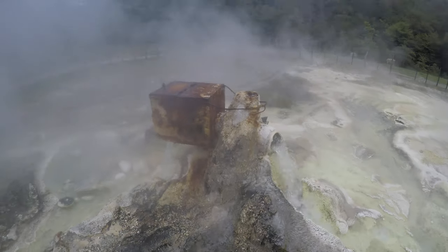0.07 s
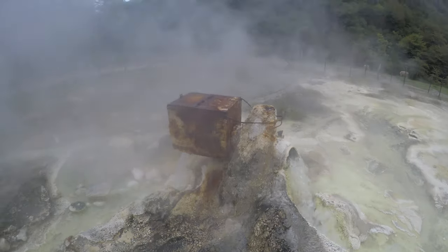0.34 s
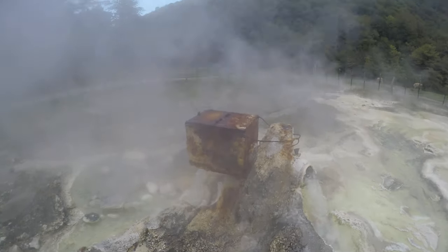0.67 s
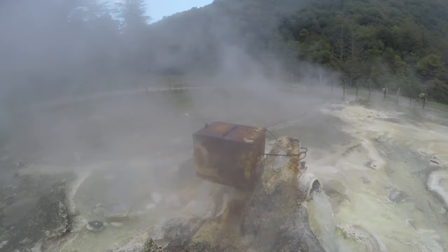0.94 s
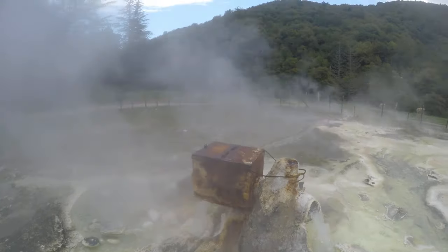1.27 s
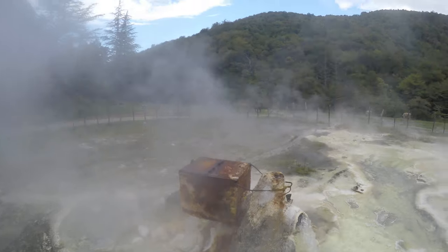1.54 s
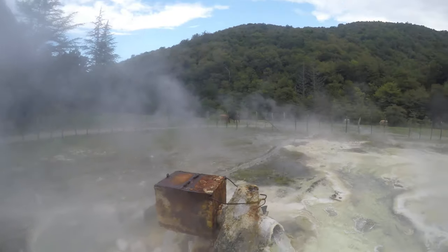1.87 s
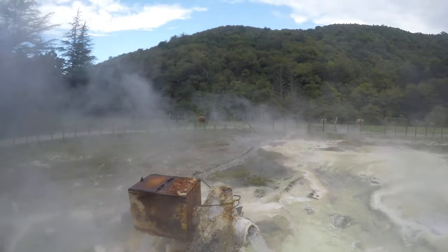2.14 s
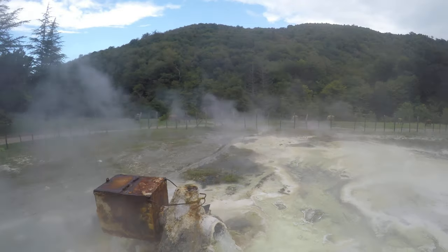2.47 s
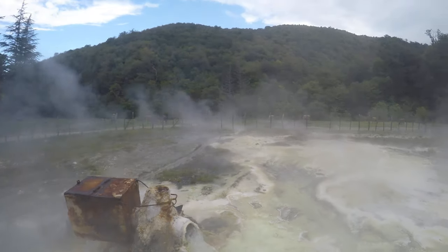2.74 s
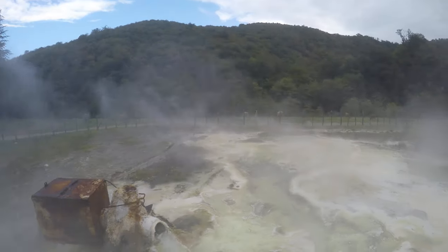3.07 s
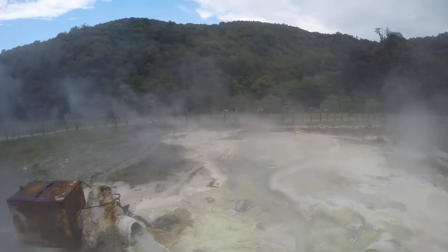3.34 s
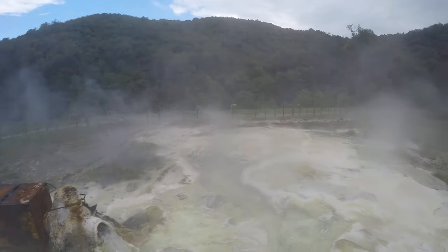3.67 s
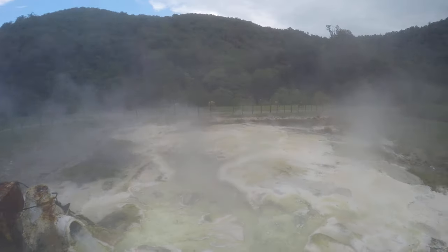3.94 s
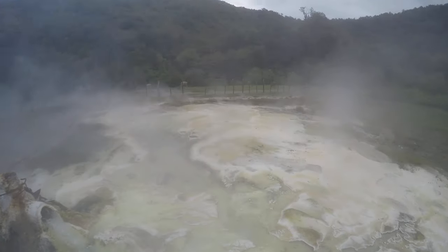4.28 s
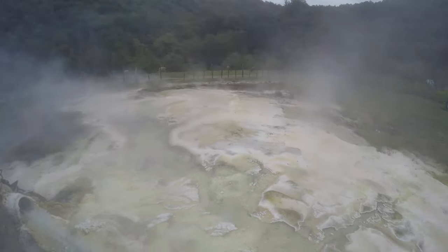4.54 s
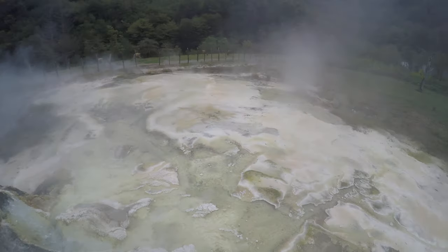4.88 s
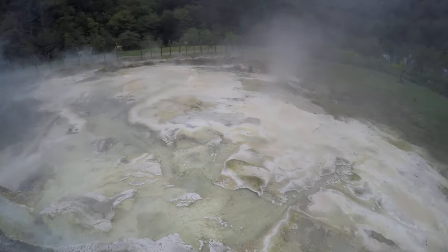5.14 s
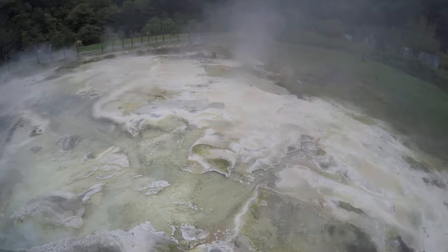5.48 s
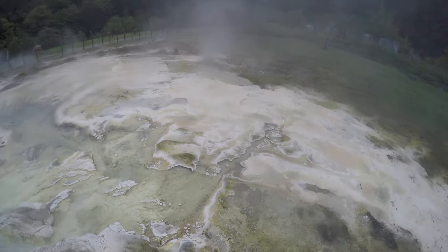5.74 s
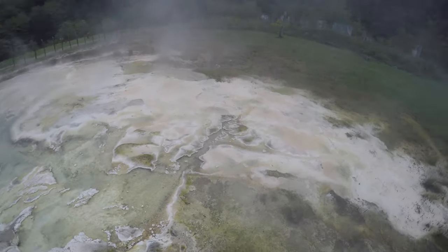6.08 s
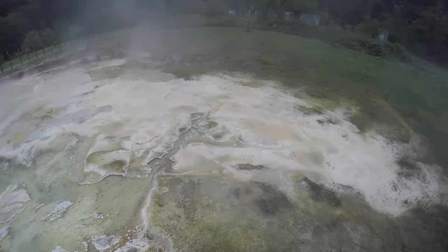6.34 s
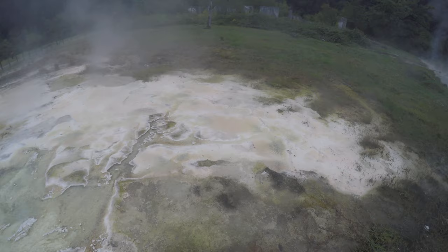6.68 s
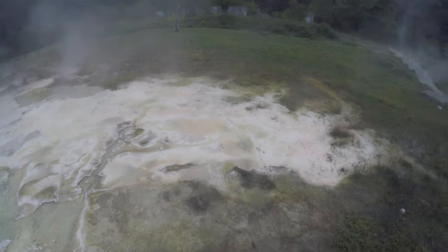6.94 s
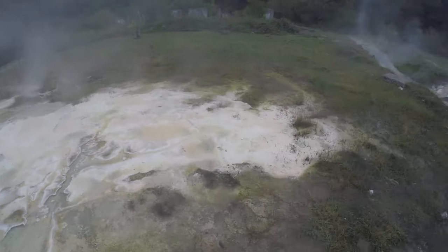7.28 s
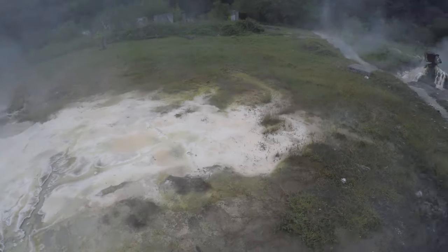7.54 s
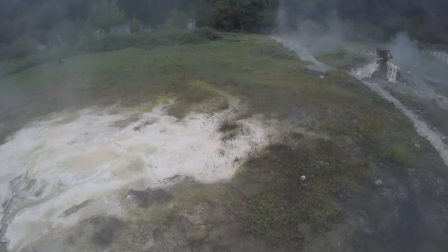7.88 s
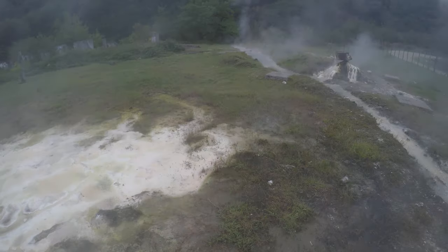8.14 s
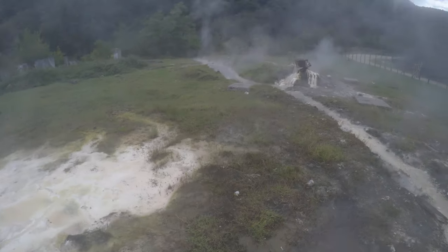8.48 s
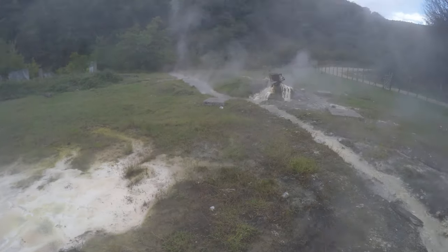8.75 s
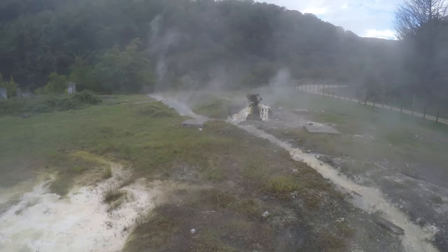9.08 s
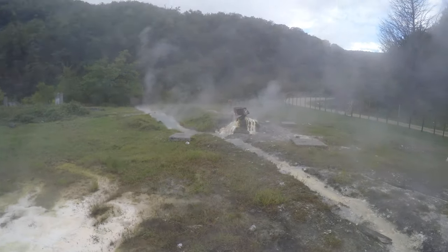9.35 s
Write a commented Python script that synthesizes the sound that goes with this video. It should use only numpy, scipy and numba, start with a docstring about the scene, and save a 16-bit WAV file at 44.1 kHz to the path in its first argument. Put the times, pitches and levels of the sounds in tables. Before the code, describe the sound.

Hot water gushes and splatters steadily from an outdoor pipe with a steamy hiss, scattered plinks and a few faint handling bumps.

```python
"""Hot water gushes from a pipe onto a mineral crust: dense drop impacts, tiny bubbles and steam hiss.
From the start heavy slugs slap down, close drops plink and fingers bump the grip of a hand-held camera.
The camera turns steadily away, and near reflections shift the colour of the splatter.
After five seconds the gush begins to fade into the camera's shadow; one loud plink follows at 6.6 s.
A light breeze on the microphone and a faint electronic whine lie underneath to the end."""
import sys
import numpy as np
from scipy import signal
from scipy.fft import rfft, irfft
from scipy.io import wavfile
from scipy.ndimage import uniform_filter1d
from numba import njit

SR = 44100
rng = np.random.default_rng(int(sys.argv[2]) if len(sys.argv) > 2 else 0)


def unload_audio(sound):
    """Save the sound as a 16-bit wav file, at the path given as the first command line argument."""
    columns = np.transpose(np.atleast_2d(sound))
    # keep every value between -1 and 1, then stretch to whole-number steps
    steps = np.round(np.clip(columns, -1, 1) * 32767)
    wavfile.write(sys.argv[1], SR, steps.astype(np.int16))


N = 414981
TIME = np.arange(N) / SR

# Level ride of the gush. Each row: time in seconds, level in dB before the turn fades and colours it.
GUSH_RIDE = [(0.0, -46.5), (0.2, -44.8), (1.0, -46), (1.3, -46.5), (2.4, -46), (4.4, -46), (5.05, -46),
             (5.45, -46.5), (6.1, -45.5), (9.4, -45.5)]
def gush(sputter_db, flutter_db, churn_db, fizz_db, gurgle_db, steam_db, away_db):
    """The jet breaks into clumps: impacts and fizz surge, the pool gurgles, steam hisses evenly."""
    clumps = walk(28)
    # the flow is steady, so every clump is followed by a thinner stretch
    clumps = clumps - uniform_filter1d(clumps, size=SR // 6)
    surge = undb(sputter_db * clumps + flutter_db * walk(85))
    fizz = bubbles(count=26000, lo_hz=2200, hi_hz=14550, cycles=27.0, spread_db=2.5)
    spray = unit(surge * (impacts(per_s=16000, spread_db=1.4) + undb(fizz_db) * fizz))
    pool = bubbles(count=6000, lo_hz=501.0, hi_hz=2210, cycles=17.4, spread_db=2.5)
    gurgle = pool * undb(gurgle_db + churn_db * walk(13))
    # turned away, more of what arrives is a diffuse wash
    steam = undb(steam_db + away_db * shade(TIME)) * rng.standard_normal(N)
    return unit(spray + gurgle + steam) * undb(curve(GUSH_RIDE, TIME) - edge_fade_db(TIME))


def impacts(per_s, spread_db):
    """Drops strike the crust as sharp clicks, many small and a few large."""
    hits = rng.random(N) < per_s / SR
    clicks = hits * rng.standard_normal(N)
    accent_db = spread_db * np.minimum(rng.exponential(size=N), 2 * np.e)
    return unit(clicks * undb(accent_db))


def bubbles(count, lo_hz, hi_hz, cycles, spread_db):
    """A cloud of short-lived bubbles, each ringing at the pitch of its size."""
    when, pitch, life, chance = rng.random((count, 4)).T
    starts = (when * N).astype(np.int64)
    hz = lo_hz * (hi_hz / lo_hz) ** pitch
    accent_db = spread_db * np.minimum(-np.log(1 - chance), 2 * np.e)
    # small bubbles ring briefly, so equal energy per Hz takes a higher peak
    peaks = hz * undb(accent_db)
    return unit(bubble_rings(starts, hz, cycles * (.5 + life), peaks, rise=0.26))


@njit
def bubble_rings(starts, hz, cycles, peaks, rise):
    """Each bubble is a damped sine that bends up in pitch as it fades."""
    out = np.zeros(N)
    for k in range(len(starts)):
        length, phase = int(cycles[k] * SR / hz[k]), 0.
        for i in range(min(length, N - starts[k])):
            phase += 2 * np.pi * hz[k] * (1 + rise * i / length) / SR
            out[starts[k] + i] += peaks[k] * np.exp(-6 * i / length) * np.sin(phase)
    return out


# The heaviest slugs of water. Each row: start in seconds, peak in dB before colouring.
SLAP_CUES = [(0.012, -31.5), (0.152, -30), (0.448, -35.5), (0.475, -36), (0.783, -38), (1.2983, -31),
             (1.387, -37), (1.4, -32.5), (2.3415, -37), (2.545, -32), (3.008, -29), (3.3965, -33.5),
             (4.209, -36), (4.329, -34), (4.426, -34), (5.229, -33.5), (5.653, -31.5), (6.312, -33),
             (6.976, -34)]
def slaps(attack_s, decay_s, pocket_hz, pocket_db):
    """Each slug lands as a short shower of impacts that rings the air pocket under it."""
    out, t = np.zeros(N), TIME[:SR // 8]
    envelope = (1 - np.exp(-t / attack_s)) * np.exp(-t / decay_s)
    for start, db in SLAP_CUES:
        shower = rng.standard_normal(len(t))
        pocket = unit(band(shower, pocket_hz / 1.83, pocket_hz * 1.52))
        slap = envelope * (shower + undb(pocket_db) * pocket)
        add(out, start, undb(db) * slap / np.abs(slap).max())
    return out


# Tone of the splatter from the front. Each row: frequency in Hz, relative level in dB.
SPLATTER_EQ = [(200, -14), (410, -13.5), (750, -7.5), (1310, -6.5), (2130, -4), (3090, -6), (4220, -6.0),
               (5280, -7.0), (6810, -14.5), (8050, -15.5), (10000, -23), (12000, -26.5), (15000, -26.5)]
# The camera body's shadow at full depth. Each row: frequency in Hz, relative gain in dB.
SHADOW_EQ = [(300, -1.0), (1800, -4), (4000, -8), (4360, -14), (5650, -12.5), (8440, -10), (10000, -6.5),
             (15000, -6.5)]
# Peaks and hollows of the microphone port. Each row: centre in Hz, width in Hz, relative gain in dB.
PORT_EQ = [(1260, 220, 1.0), (1590, 180, -2.0), (1830, 180, 1.0), (2930, 270, 5.0), (3280, 390, 5.0),
           (3730, 160, -3.5), (3960, 200, -0.5), (4250, 230, -2.5), (7400, 1000, 0.5), (13460, 980, 2.5)]
# Near reflections that add or cancel as the camera turns. Each row: centre in Hz, width in Hz,
# relative gain in dB, strongest heading in degrees, width of the heading range in degrees.
REFLECTION_EQ = [ (680, 285, -5.5, 133, 65), (890, 280, -6, 168, 40), (983, 183, -3.5, 45, 85),
                 (1800, 256, 5.5, 118, 100), (1950, 430, -3.5, 32, 22), (2288, 280, 8, 3.7, 75),
                 (2474, 275, -8, 52, 78), (3053, 380, -10.5, 151, 70), (4870, 810, -8.5, 137, 56),
                 (5450, 850, 4, 116, 42), (6140, 510, -5, 56, 91), (6380, 260, -8.5, 110, 59),
                 (7500, 1200, 3, 128, 40), (8560, 1400, 7.5, 35, 36), (8870, 1400, -6, 117, 124),
                 (10850, 610, -6.5, 82, 71), (11800, 900, 4, 5, 45)]
def colour(water):
    """Crust, shadow, port and reflections shape the water: a moving EQ held at constant power."""
    hz, times, frames = signal.stft(water, SR, nperseg=1024)
    hz = hz[:, None]
    db = spectrum_db(SPLATTER_EQ, hz) + spectrum_db(SHADOW_EQ, hz) * shade(times)
    for centre, width, peak_db in PORT_EQ:
        db += peak_db * bell(hz, centre, width)
    for centre, width, peak_db, best_deg, range_deg in REFLECTION_EQ:
        db += peak_db * bell(hz, centre, width) * bell(heading(times), best_deg, range_deg)
    gain = undb(db)
    gain /= np.sqrt(np.mean(gain ** 2, axis=0))
    return signal.istft(frames * gain, SR)[1][:N]


# The slow turn away from the pipe. Each row: time in seconds, heading in degrees.
TURN = [(0, -10), (1.5, 18), (4.0, 57), (6.0, 105.5), (8.3, 165), (9.4, 176)]
def heading(times):
    """Degrees between the camera's axis and the outlet."""
    return curve(TURN, times)


def edge_fade_db(times, edge_deg=87.5, db_per_deg=0.1126):
    """Past the edge of the camera body the gush fades with every further degree."""
    return db_per_deg * np.maximum(heading(times) - edge_deg, 0)


def shade(times, half_deg=126, soft_deg=19):
    """Depth of the camera's shadow: near 0 facing the outlet, near 1 turned away."""
    return .5 + .5 * np.tanh((heading(times) - half_deg) / (2 * soft_deg))


# Close drops that trap a bubble. Each row: start in seconds, level of the ring in dB, pitch in Hz.
PLINK_CUES = [(0.195, -31.5, 4300), (0.447, -31, 5100), (0.572, -35, 2270), (0.788, -37, 2160),
              (2.345, -33, 3100), (3.317, -39.5, 1280), (3.609, -34, 1980), (5.106, -47.5, 540),
              (5.853, -32, 5560), (6.614, -20, 1760), (7.6615, -36, 1930), (8.364, -42, 1640),
              (9.358, -43, 2220)]
def plinks(swell_cycles, ring_cycles, tick_db):
    """A drop ticks on landing; its bubble swells and quickly dies away, small ones soonest."""
    out, t = np.zeros(N), TIME[:SR // 20]
    for start, db, hz in PLINK_CUES:
        cycles = t * hz
        envelope = (1 - np.exp(-cycles / swell_cycles)) ** 2 * undb(-60 * cycles / ring_cycles)
        bubble = envelope / envelope.max() * np.sin(2 * np.pi * cycles)
        splash = unit(band(rng.standard_normal(len(t)), 820, 4800))
        tick = undb(tick_db) * np.exp(-t / 0.0017) * splash
        add(out, start, undb(db) * (bubble + tick))
    return out


# Low modes of the camera on its grip. Each row: pitch in Hz, relative level in dB, seconds to fall 60 dB.
GRIP_MODES = [(99, -6, 0.11), (110.8, 16, 0.19), (127, -11, .07)]
# Knock of the plastic case. Each row: pitch in Hz, relative level in dB, seconds to fall 60 dB.
CASE_MODES = [(275, -3, 0.017), (597, -4, 0.015), (1620, 0, 0.017)]
# Fingers bumping the grip. Each row: start in seconds, peak of the thud in dB, hardness from 0 to 1.
BUMP_CUES = [(0.093, -43, 0.1), (1.035, -42.5, 0.36), (1.824, -48, 0.24), (2.655, -34.5, 0),
             (3.015, -45.5, 0.4), (3.958, -31.5, 0.43), (4.992, -41.5, 0.1), (5.614, -38.5, 0),
             (6.44, -33.5, 0.58), (8.482, -31, 0.5), (9.072, -40, 0.1), (9.138, -38.5, 0.25),
             (9.238, -39.5, 0), (9.328, -41, 0)]
# Fingers shifting on the grip. Each row: start in seconds, length in seconds, level in dB.
SHUFFLE_CUES = [(4.355, 0.24, -59), (5.683, 0.22, -59), (6.495, 0.19, -52), (9.08, 0.27, -55)]
def handling(contact_s, resting_db, shuffle_fade_s):
    """Soft pushes ring the grip, harder ones also knock the case; shifting fingers keep it murmuring."""
    out, t = np.zeros(N), TIME[:SR // 3]
    push = np.sin(np.pi * np.minimum(t / contact_s, 1))
    thud = signal.fftconvolve(modes(GRIP_MODES, t), push)[:len(t)]
    knock = modes(CASE_MODES, t)
    for start, db, hardness in BUMP_CUES:
        add(out, start, undb(db) * (thud / np.abs(thud).max() + hardness * knock))
    murmur = unit(signal.fftconvolve(rng.standard_normal(N), thud)[:N])
    rubbing = undb(resting_db)
    for start, length, db in SHUFFLE_CUES:
        inside_s = np.minimum(TIME - start, start + length - TIME)
        rubbing = rubbing + undb(db) * np.clip(.5 + inside_s / shuffle_fade_s, 0, 1)
    return out + murmur * rubbing


# Tone of the wind rumble. Each row: frequency in Hz, relative level in dB before the treble roll-off.
BREEZE_EQ = [(10, -5.5), (22, -1.5), (38, -1), (52, -7.5), (72, -13), (110, -11), (150, -27), (250, -30.5),
             (600, -36.5)]
def breeze(level_db, gust_db, rolloff_hz):
    """Low turbulence at the microphone, swelling a little."""
    hz = np.arange(N // 2 + 1) * SR / N
    tone = undb(spectrum_db(BREEZE_EQ, hz)) / (1 + (hz / rolloff_hz) ** 2)
    rumble = irfft(rfft(rng.standard_normal(N)) * tone, N)
    return unit(rumble) * undb(level_db + gust_db * walk(2.6))


# Thin tones at the very top. Each row: pitch in Hz, rms level in dB.
WHINE_TONES = [(7350, -87), (14700, -86)]
def whine():
    """The camera's electronics give off two faint tones that waver in pitch."""
    drift = 1 + 0.0011 * walk(60)
    phase_per_hz = 2 * np.pi * np.cumsum(drift) / SR
    return sum(np.sqrt(2) * undb(db) * np.sin(hz * phase_per_hz) for hz, db in WHINE_TONES)


def modes(table, t):
    """The ring of an object after one tap."""
    return sum(undb(db - 60 * t / t60) * np.sin(2 * np.pi * hz * t) for hz, db, t60 in table)


def walk(rate):
    """Smooth random wobble of rms 1, changing about rate times a second."""
    hold = max(int(SR / rate), 2)
    steps = np.repeat(rng.standard_normal(N // hold + 1), hold)
    return unit(uniform_filter1d(steps, hold)[:N])


def band(x, lo_hz, hi_hz):
    """Gentle band-pass."""
    return signal.sosfilt(signal.butter(2, [lo_hz, hi_hz], "band", fs=SR, output="sos"), x)


def bell(x, centre, width):
    """A bump of height 1 with the given full width at half height."""
    return 2 ** -(2 * (x - centre) / width) ** 2


def spectrum_db(points, hz):
    """An EQ curve read on a log-frequency axis."""
    point_hz, db = np.transpose(points)
    return np.interp(np.log(hz + 1), np.log(point_hz), db)


def curve(rows, times):
    """An automation curve read at the given times."""
    return np.interp(times, *np.transpose(rows))


def add(out, start_s, sound):
    """Mix a sound in at its cue."""
    i = int(start_s * SR)
    out[i:i + len(sound)] += sound[:max(N - i, 0)]


def undb(db):
    """Decibels to gain."""
    return 10 ** (np.asarray(db) / 20)


def unit(x):
    """Scale to rms 1."""
    return x / np.sqrt(np.mean(x ** 2))


def scene():
    """The mono mix: water coloured by the turn, small close sounds, and a bed of breeze and whine."""
    water = gush(sputter_db=0.81, flutter_db=1.3, churn_db=2.5,
                 fizz_db=-1.5, gurgle_db=-12, steam_db=-7.5, away_db=6)
    water += slaps(attack_s=0.00056, decay_s=0.0093, pocket_hz=2300, pocket_db=-19)
    drops = plinks(swell_cycles=1.05, ring_cycles=19, tick_db=-12.5)
    fingers = handling(contact_s=0.0062, resting_db=-70, shuffle_fade_s=0.04)
    bed = breeze(level_db=-55.0, gust_db=1.5, rolloff_hz=1000) + whine()
    return (colour(water) + drops + fingers + bed)[None]


def record(dry):
    """The camera cuts the top steeply above 15.3 kHz."""
    return signal.sosfilt(signal.ellip(12, .1, 80, 15300, fs=SR, output="sos"), dry)


dry = scene()
out = record(dry)
unload_audio(out)
```